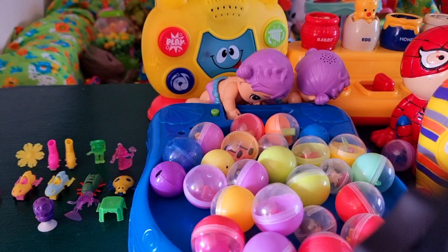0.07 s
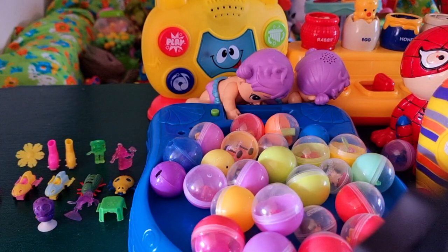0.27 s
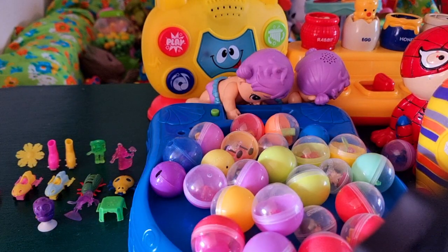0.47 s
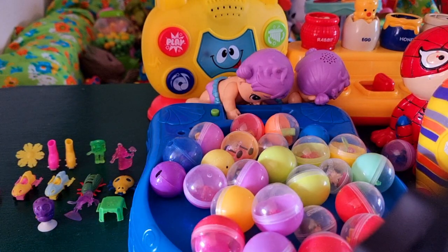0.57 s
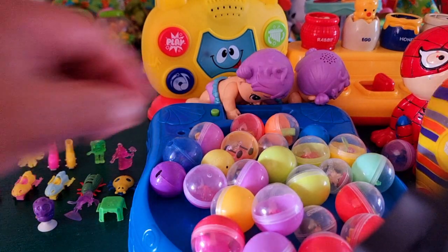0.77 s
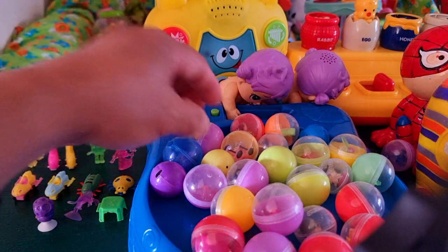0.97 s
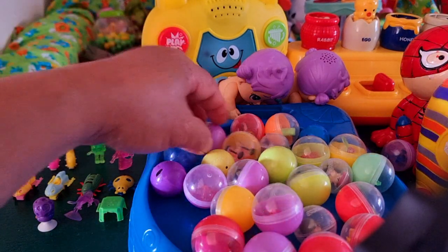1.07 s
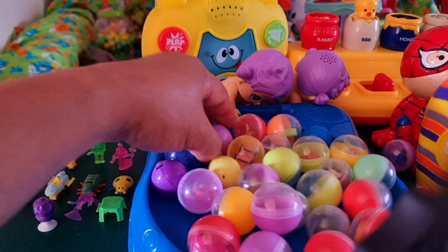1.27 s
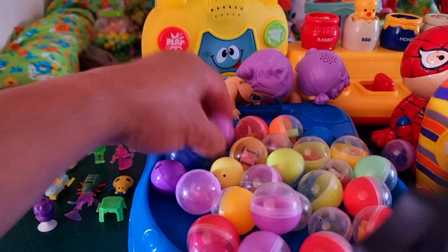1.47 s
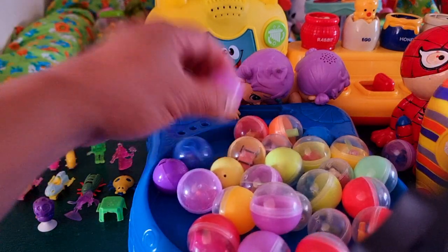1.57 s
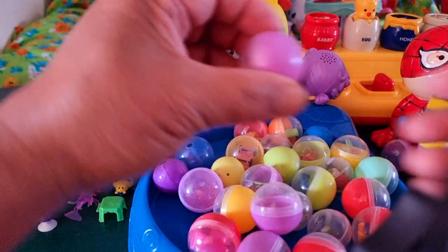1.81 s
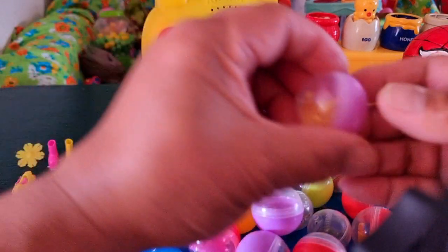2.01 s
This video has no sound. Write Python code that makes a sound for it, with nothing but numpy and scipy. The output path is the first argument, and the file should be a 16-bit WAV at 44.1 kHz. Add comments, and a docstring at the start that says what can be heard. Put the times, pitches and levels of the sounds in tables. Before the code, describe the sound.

Plastic capsule balls clatter close to the microphone in a small room. First a hard plastic piece clacks and a hand slides and bumps on a table; then the balls jostle, one drops back, and fingers tick on another.

```python
"""Hard plastic and capsule balls

Close up in a small room, a hard plastic piece clacks and rings in its modes while a hand slides with
a dry frictional hiss. After soft bumps on the table the hand rummages in a plastic tray of hollow
capsule balls: they rub and knock, one drops back against the tray, and the fingers tick on the one
picked out. Each impact excites damped free vibration. A low appliance hum lies underneath."""
import sys
import numpy as np
from scipy import signal
from scipy.fft import rfft, irfft, next_fast_len
from scipy.io import wavfile

SR = 44100
rng = np.random.default_rng(int(sys.argv[2]) if len(sys.argv) > 2 else 0)


def to_wav(sig):
    """Store sig (one row per channel, or 1-D mono) as 16-bit WAV at the path in sys.argv[1].

    Samples outside -1..1 are clipped; the rate is SR.
    """
    pcm = np.clip(np.atleast_2d(sig), -1, 1) * 32767
    pcm = np.round(pcm).astype(np.int16)
    wavfile.write(sys.argv[1], SR, pcm.T)  # frames by channels


N = 90404
T = np.arange(N) / SR
HIT_T = T[:SR // 3]  # time since a contact, s

# Levels are relative. Hard contacts: t/s, level/dB
PIECE_CLACKS = [(.2462, -2), (.2516, 2.5), (.2622, -0.5), (.2705, -9), (.277, -15.5)]
TRAY_DROP = [(1.4511, -4), (1.452, -2), (1.4607, -11)]
# Contacts of varied hardness: t/s, level/dB, low-pass f/Hz, high-pass f/Hz, resonance f/Hz, pan/dB
CAPSULE_KNOCKS = [(1.0598, -3, 2000, 1100, 1700, 0), (1.0672, -4, 1500, 800, 1300, -2),
                  (1.072, -13, 900, 298, 312, 3), (1.0795, -15, 1390, 500, 1120, 0),
                  (1.0985, -16, 2800, 600, 2140, -7.5), (1.1165, -26, 3500, 500, 1700, 10),
                  (1.131, -18, 1300, 700, 1010, -1.5), (1.147, -20.5, 1410, 700, 1190, -3.5),
                  (1.1762, -7.5, 2320, 900, 2070, -1.5), (1.2052, -22, 14000, 2500, 12360, -3),
                  (1.2105, -6, 3100, 594, 1094, -4), (1.2308, -3, 3000, 1400, 2550, -16),
                  (1.2366, 1.5, 8670, 1210, 2700, 0), (1.2455, -11, 6400, 605, 6900, -16.5),
                  (1.2885, -3, 3200, 900, 2300, 2.5), (1.3012, -4, 13600, 900, 1900, -6),
                  (1.3045, -7.5, 4600, 497, 3300, 2.5), (1.3078, -1.5, 3200, 450, 880, -7),
                  (1.347, -11.5, 1600, 600, 1050, 3), (1.415, -30.5, 1200, 800, 1050, -2.5),
                  (1.44, -22, 1520, 605, 1100, 12.5)]
TABLE_BUMPS = [(.3138, 4.5, 2580, 640, 734, -8), (.66, -3, 2560, 634, 1310, 0.5),
               (.9445, -4.5, 575, 79.5, 920, -4.5)]
FINGER_TAPS = [(1.627, -5.5, 1600, 605, 970, -9), (1.6605, -3, 2040, 600, 980, -3),
               (1.7535, -6.5, 3020, 1830, 2400, 3), (1.8265, 1, 2280, 900, 1130, -6)]
# Normal modes of each body: f/Hz, level/dB, T60/s
PIECE_MODES = [(1520, -20, .05), (1895, -6, .08), (2480, -17, .12), (2640, -7, .065), (3116, -12, .04),
               (3420, -6, .075), (3548, 1.5, .085), (3745, -6, .055), (4020, -7, .025), (4700, -12, .055),
               (5000, -7, .055), (5730, -16, .16), (5830, -4, .04), (7500, -15, .07), (8680, -19, .045)]
CAPSULE_MODES = [(820, -13.5, .04), (1010, -4, 0.02), (1097, 0.5, 0.011), (1275, -3, 0.055),
                 (1700, 3.5, 0.015), (1840, 3.5, 0.017), (2400, -18, .03), (2620, -11, 0.024),
                 (3256, 1.5, 0.054), (4090, 3.5, 0.019)]
TRAY_MODES = [(309.6, -12.5, 0.1), (582, -2.5, 0.075), (875, -5, 0.078), (948, -5, 0.049), (1120, 5, 0.019),
              (1181, 9.5, 0.029), (1636, 9, 0.026), (1907, 1.5, 0.067), (2200, -13, .04), (2874, 6, 0.033),
              (3400, 1, 0.06), (3670, -12.5, 0.076), (4460, -21, .035), (5093, -15, 0.043)]
TABLE_MODES = [(82, -1, 0.16), (117, 3, 0.097), (245, -9.5, 0.1), (524, 3, 0.047), (700, -5, 0.024),
               (900, -13, 0.032)]
BALL_MODES = [(998, -5.5, 0.026), (1130, -2.5, 0.018), (1676, -5, 0.019), (1897, -0.5, 0.041),
              (2400, -8.5, 0.014), (3200, -20.5, 0.092)]
# Spectral envelopes of impact, friction and air noise: f/Hz, level/dB
PIECE_SPECTRUM = [(200, -43), (900, -23.5), (1500, -3.5), (2600, -11), (3600, -7.5), (4400, -2),
                  (6000, -8.5), (8100, -18), (10500, -27.5), (13000, -18.5), (16000, -14.5)]
CAPSULE_SPECTRUM = [(88, -64.5), (150, -8.5), (361, 3), (601, -7), (854, 2), (1480, -9.5), (2650, -2.5),
                    (2920, -11), (3350, -7), (3700, -3), (7500, -19), (9500, -28), (14500, -14),
                    (16000, -31.5)]
TRAY_SPECTRUM = [(100, -45.5), (280, -3.5), (750, -5), (1200, -4), (2200, -3), (5000, -6.5), (5900, -21),
                 (7500, -20.5), (10500, -34), (15000, -36)]
TABLE_SPECTRUM = [(60, -9), (150, -11), (600, 0.5), (950, -16.5), (1200, -16.5), (4000, -7.5)]
SLIDE_SPECTRUM = [(59, -52.5), (100, -21.5), (129, -2.5), (166, -20), (266, -12), (500, -3), (872, -12.5),
                  (1360, -3), (1680, -5), (3320, -5.5), (6560, -8.5), (10500, -18), (15000, -11),
                  (16000, -26)]
JOSTLE_SPECTRUM = [(120, -26), (200, -9.5), (300, 2), (600, -11.5), (1050, -0.5), (1450, -9.5),
                   (1850, -3.5), (2600, -15), (4000, -17.5), (5500, -25.5), (7500, -22), (10000, -39.5),
                   (15000, -32.5)]
AIR_SPECTRUM = [(20, 2.5), (35, 6.5), (50, 0.5), (100, -1), (200, -8.5), (350, -10.5), (850, -16.5),
                (1100, -23.5), (1400, -21.5), (1850, -12.5), (2500, -26), (4000, -29), (8000, -33.5),
                (16000, -53)]
# Friction envelopes of the sliding hand and the jostling balls: t/s, level/dB
SLIDE_ENVELOPE = [(0, -49), (.1, -48.5), (.235, -48), (.3, -41), (.35, -39), (.4, -41.5), (.43, -38),
                  (.455, -39), (.48, -38), (.53, -42), (.57, -46.5), (.62, -44.5), (.665, -42.5),
                  (.71, -45), (.75, -52.5), (.79, -59), (.83, -61.5), (.88, -73.5), (.95, -100)]
JOSTLE_ENVELOPE = [(1.0, -92), (1.04, -60.5), (1.08, -37.5), (1.12, -57.5), (1.165, -56.5), (1.21, -42.5),
                   (1.25, -36), (1.28, -38), (1.32, -40.5), (1.36, -47.5), (1.405, -64.5), (1.44, -46),
                   (1.5, -54.5), (1.6, -58), (1.7, -63), (1.85, -65.5), (2.05, -83.5)]
# Brief resonant clicks: the first as the plastic piece is set down, the rest catches of the sliding hand: t/s,
# level/dB, resonance f/Hz
HAND_CATCHES = [(0.3137, -2, 5900), (0.3618, 6, 3620), (0.659, -11, 4750), (0.6941, -1, 5900),
                (0.808, -22, 7800)]
# Partials of the appliance hum: f/Hz, level/dB
HUM_PARTIALS = [(68.3, -59.5), (183, -75)]
# Coherence of the sound field: f/Hz, left-right correlation
COHERENCE = [(100, 0.33), (300, 0.78), (700, 0.13), (1500, 0.54), (4000, 0.15), (12000, .25)]

# Impact settings of each body; t60 (s) belongs to the dense ringing, detune is a relative spread
PIECE = dict(modes_db=-19, dense_db=-1.5, tick_db=-3, t60=0.048, detune=0,
             room_db=-11, pan_db=-2.5, lag_ms=-0.3)
CAPSULE = dict(modes_db=-30, dense_db=-4.5, tick_db=-7.5, t60=0.043, detune=0.03,
               room_db=-12, pan_db=0.5, lag_ms=0.11)
TRAY = dict(modes_db=-23.5, dense_db=6, tick_db=-5, t60=0.04, detune=0,
            room_db=-15.5, pan_db=-2, lag_ms=0.13)
TABLE = dict(modes_db=-40.5, dense_db=-4, tick_db=-38, t60=0.092, detune=0,
             room_db=-8.5, pan_db=2, lag_ms=0.023)
BALL = dict(modes_db=-43, dense_db=-29.5, tick_db=-40, t60=0.036, detune=0.015,
            room_db=-34, pan_db=-0.5, lag_ms=0.05)


def plastic_piece():
    """Impact excitation: a quick run of hard contacts sets the piece ringing."""
    return hard_hits(PIECE_CLACKS, PIECE_MODES, PIECE_SPECTRUM, PIECE)


def capsules_in_tray():
    """Friction and collision: hollow balls rub and knock, and one drops, exciting the tray's modes."""
    rubbing = friction(JOSTLE_ENVELOPE, JOSTLE_SPECTRUM, slips_per_s=2100, spread_db=2.5, pan_db=-1)
    knocks = soft_hits(CAPSULE_KNOCKS, CAPSULE_MODES, CAPSULE_SPECTRUM, CAPSULE)
    drop = hard_hits(TRAY_DROP, TRAY_MODES, TRAY_SPECTRUM, TRAY)
    return delay(rubbing, CAPSULE["lag_ms"]) + knocks + drop


def sliding_hand(pan_db=-1.5):
    """Stick-slip friction: a dry hiss, with a brief resonant burst wherever the hand catches."""
    out = friction(SLIDE_ENVELOPE, SLIDE_SPECTRUM, slips_per_s=9000, spread_db=0.5, pan_db=pan_db)
    for start, db, hz in HAND_CATCHES:
        catch = resonate(colour(burst(t60=0.02), SLIDE_SPECTRUM), hz, gain_db=19)
        add(out, start, from_db(db - 24) * pan(pan_db) * catch)
    return delay(out, lag_ms=-0.32)


def table_bumps():
    """Damped vibration: the table answers soft contacts with dull thuds."""
    return soft_hits(TABLE_BUMPS, TABLE_MODES, TABLE_SPECTRUM, TABLE)


def finger_ticks():
    """Shell vibration: fingers lightly excite the modes of the lifted ball."""
    return soft_hits(FINGER_TAPS, BALL_MODES, CAPSULE_SPECTRUM, BALL)


def hard_hits(contacts, modes, spectrum, body):
    """Struck bodies: little sound comes out below half the lowest mode."""
    out = np.zeros((2, N))
    for start, db in contacts:
        add(out, start, from_db(db) * strike(modes, spectrum, **body))
    lowest_hz = modes[0][0]
    return signal.sosfilt(butterworth(lowest_hz / 2, "high", order=4), out + 1e-18)


def soft_hits(contacts, modes, spectrum, body):
    """Contact filtering: soft blows lose treble, glancing ones bass; each spot favours a resonance."""
    out = np.zeros((2, N))
    for start, db, top_hz, bass_hz, spot_hz, pan_db in contacts:
        contact_band = np.vstack([butterworth(top_hz, "low"), butterworth(bass_hz, "high")])
        hit = signal.sosfilt(contact_band, strike(modes, spectrum, **body))
        add(out, start, from_db(db) * pan(pan_db) * resonate(hit, spot_hz, gain_db=8.5))
    return out


def strike(modes, spectrum, modes_db, dense_db, tick_db, t60, detune, room_db, pan_db, lag_ms):
    """Modal superposition: damped sinusoids, a tick and dense ringing, followed by room reflections."""
    ring = np.zeros(len(HIT_T))
    for k, (hz, db, mode_t60) in enumerate(modes):
        envelope = from_db(db + modes_db + rng.normal(0, 1) - 60 * HIT_T / mode_t60)
        detuned_hz = hz * (1 + detune * rng.normal())
        ring += (-1) ** k * envelope * np.sin(2 * np.pi * detuned_hz * HIT_T)
    tick = from_db(tick_db) * (HIT_T == 0)
    dense = from_db(dense_db) * burst(t60)
    direct = ring + colour(tick + dense, spectrum)
    reflected = signal.fftconvolve(direct, room_response(), axes=1)[:, :len(HIT_T)]
    return pan(pan_db) * delay(direct + from_db(room_db) * reflected, lag_ms)


def friction(envelope, spectrum, slips_per_s, spread_db, pan_db):
    """Shot noise: tiny slips of uneven size come in clumps, and sound duller as the pressure eases."""
    clump_s, firm_rub_db = 0.0044, -52
    clump_db = 2 * np.interp(T / clump_s, np.arange(N), rng.standard_normal(N))
    slipping = rng.random(N) < slips_per_s / SR
    size_db = spread_db * np.minimum(rng.exponential(1, N), 4)
    slips = slipping * from_db(clump_db + size_db) * rng.standard_normal((2, N))
    hiss = rms_one(colour(widen(slips), spectrum))
    level_db = np.interp(T, *np.transpose(envelope))
    dull = signal.sosfiltfilt(butterworth(3200, "low"), hiss)
    treble_gain = from_db(0.35 * np.minimum(level_db - firm_rub_db, 0))
    return pan(pan_db) * (dull + treble_gain * (hiss - dull)) * from_db(level_db)


def resonate(x, hz, gain_db):
    """Resonance: the touched spot reinforces one narrow band."""
    return x + from_db(gain_db) * signal.lfilter(*signal.iirpeak(hz, Q=10, fs=SR), x)


def burst(t60, build_s=0):
    """Statistical decay: many close modes or reflections merge into exponentially dying noise."""
    onset = 1 - np.exp(-HIT_T / (build_s + 1 / SR))
    envelope = onset * from_db(-60 * HIT_T / t60)
    return widen(rng.standard_normal((2, len(HIT_T)))) * envelope / np.linalg.norm(envelope)


def room_response(split_hz=2600, build_s=0.0046):
    """Reverberation: a small furnished room absorbs the treble first."""
    bass = signal.sosfilt(butterworth(split_hz, "low"), burst(t60=0.35, build_s=build_s))
    treble = signal.sosfilt(butterworth(split_hz, "high"), burst(t60=0.16, build_s=build_s))
    return bass + treble


def room_tone():
    """Line and continuous spectra: a low appliance hum in faint air noise."""
    hum = sum(np.sqrt(2) * from_db(db) * np.sin(2 * np.pi * (hz * T + rng.random()))
              for hz, db in HUM_PARTIALS)
    air = rms_one(colour(widen(rng.standard_normal((2, N))), AIR_SPECTRUM))
    return hum + from_db(-66.5) * air


def shadow(pair, corner_hz=4900, treble_db=-6.5):
    """Acoustic shadow: sound from the right reaches the left microphone with less treble."""
    left, right = pair
    low = signal.lfilter(*signal.butter(1, corner_hz, fs=SR), left)
    return np.array([low + from_db(treble_db) * (left - low), right])


def widen(pair):
    """Partial coherence: two independent signals mix into left and right, most alike near 300 Hz."""
    size = pair.shape[-1]
    correlation = at_hz(COHERENCE, size)
    mid, side = irfft(rfft(pair) * np.sqrt([1 + correlation, 1 - correlation]), size)
    return np.array([mid + side, mid - side]) / np.sqrt(2)


def pan(db):
    """Level difference: left and right gains; positive values favour the left."""
    return from_db(np.array([[db], [-db]]) / 2)


def delay(pair, lag_ms):
    """Arrival-time difference: a positive lag delays the right side, a negative one the left."""
    lag = round(lag_ms * SR / 1000)
    return np.array([np.pad(x, (max(k, 0), 0))[:len(x)] for x, k in zip(pair, (-lag, lag))])


def colour(x, spectrum):
    """Minimum-phase filtering: a causal response of unit energy follows the spectral envelope."""
    size = next_fast_len(x.shape[-1] + SR // 10, True)
    magnitude = rms_one(from_db(at_hz(spectrum, size)))
    cepstrum = irfft(np.log(magnitude), size)
    cepstrum[1:size // 2] *= 2  # fold onto positive time
    cepstrum[size // 2 + 1:] = 0
    response = np.exp(rfft(cepstrum))
    return irfft(rfft(x, size) * response, size)[..., :x.shape[-1]]


def butterworth(hz, kind, order=2):
    """Maximally flat filter, in second-order sections."""
    return signal.butter(order, hz, kind, fs=SR, output="sos")


def at_hz(points, size):
    """Interpolation in log frequency onto the bins of a transform."""
    hz, value = np.transpose(points)
    return np.interp(np.log(np.fft.rfftfreq(size, 1 / SR) + 1), np.log(hz), value)


def from_db(db):
    """Amplitude ratio of a level."""
    return 10 ** (np.asarray(db) / 20)


def rms_one(x):
    """Normalisation to unit power."""
    return x / np.sqrt(np.mean(x ** 2) + 1e-20)


def add(out, start_s, sound):
    """Superposition of a sound from a given time on."""
    i = int(start_s * SR)
    out[:, i:i + sound.shape[-1]] += sound[:, :N - i]


def scene():
    """Linear superposition of all sources; the piece and the sliding hand lie to the right."""
    piece = plastic_piece()
    bumps = table_bumps()
    ticks = finger_ticks()
    return shadow(piece + sliding_hand()) + capsules_in_tray() + bumps + ticks + room_tone()


def record(dry):
    """Band limiting: an elliptic low-pass cuts the highest treble steeply."""
    return signal.sosfilt(signal.ellip(10, rp=0.2, rs=80, Wn=15900, fs=SR, output="sos"), dry)


dry = scene()
out = record(dry)
to_wav(out)
```